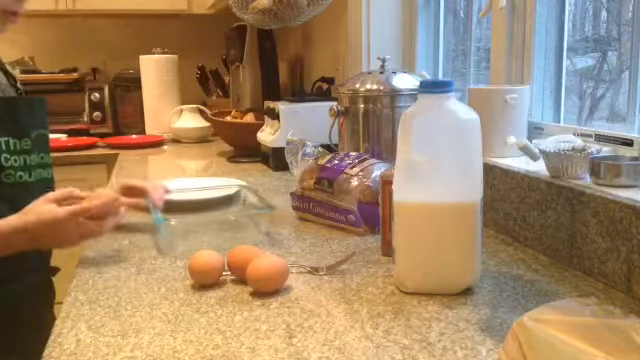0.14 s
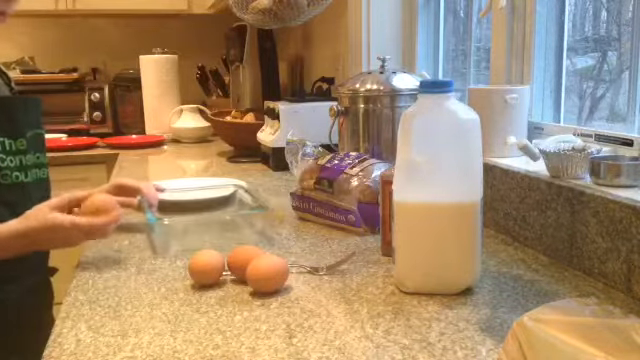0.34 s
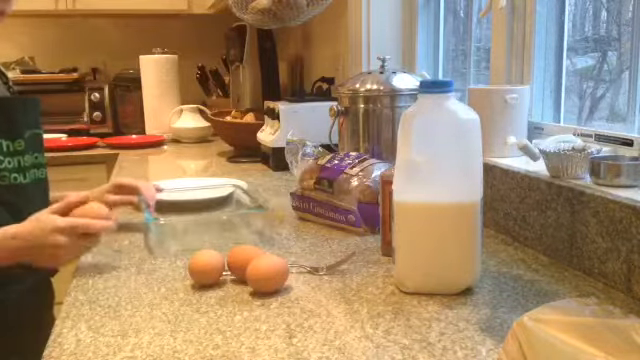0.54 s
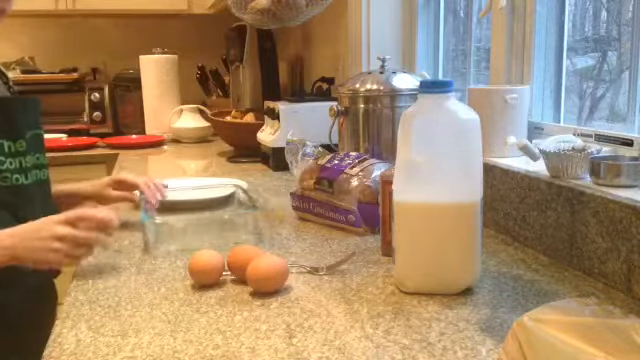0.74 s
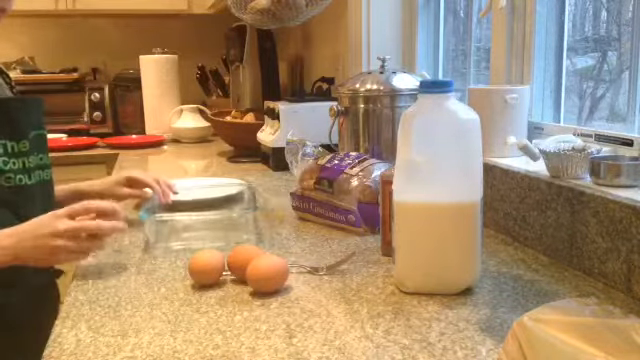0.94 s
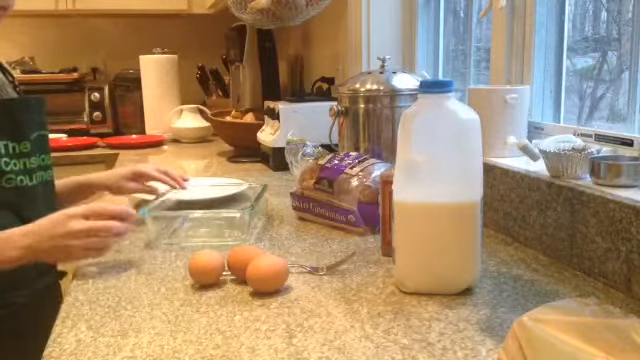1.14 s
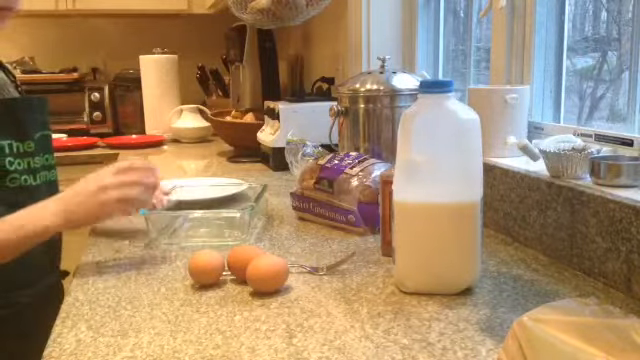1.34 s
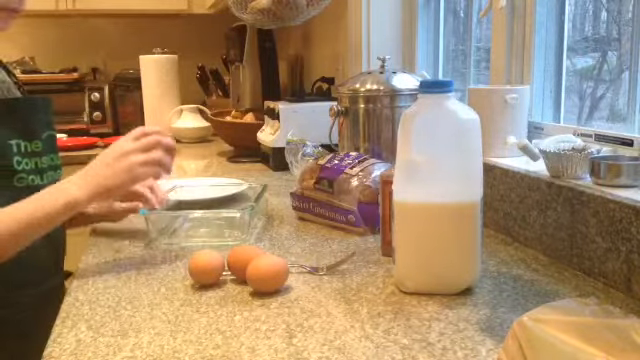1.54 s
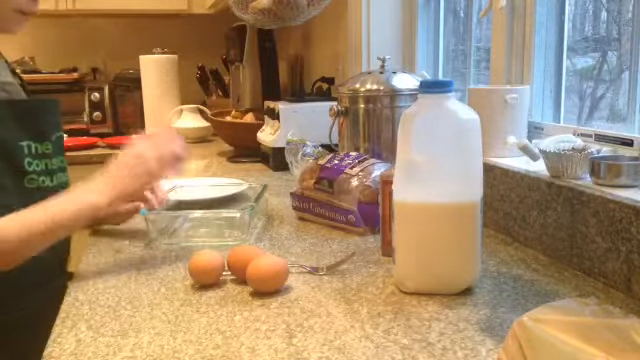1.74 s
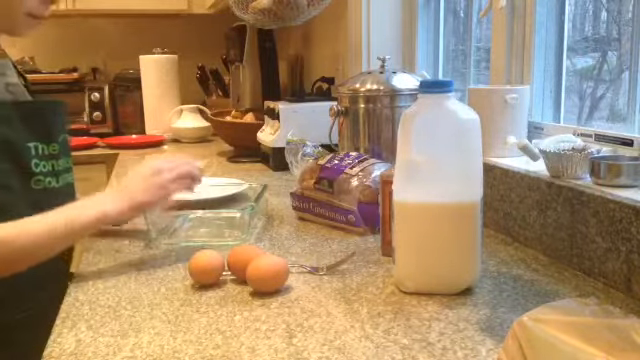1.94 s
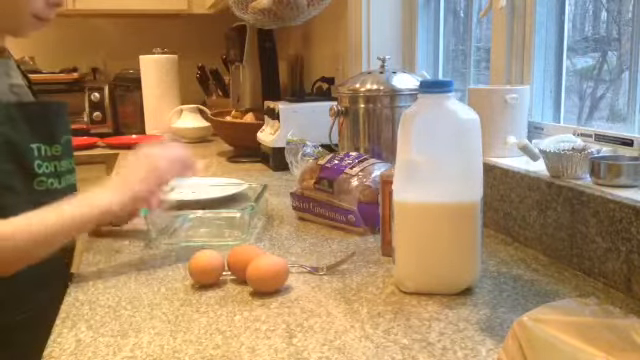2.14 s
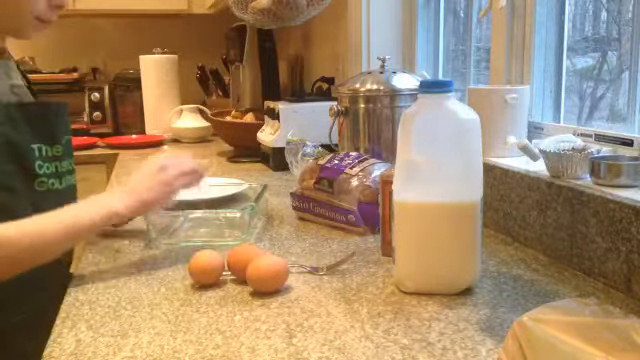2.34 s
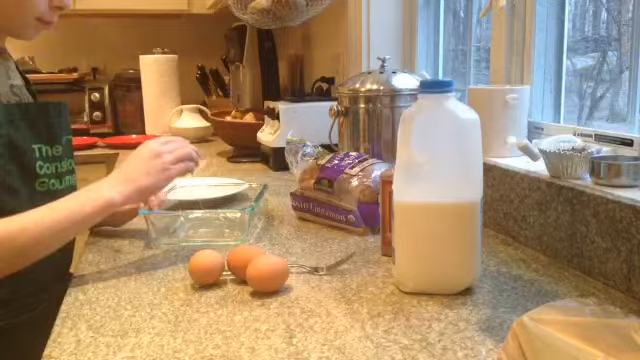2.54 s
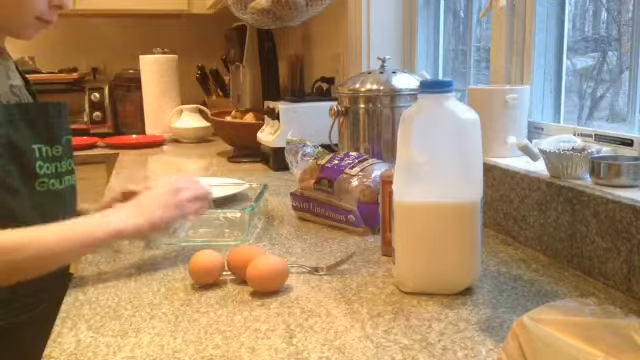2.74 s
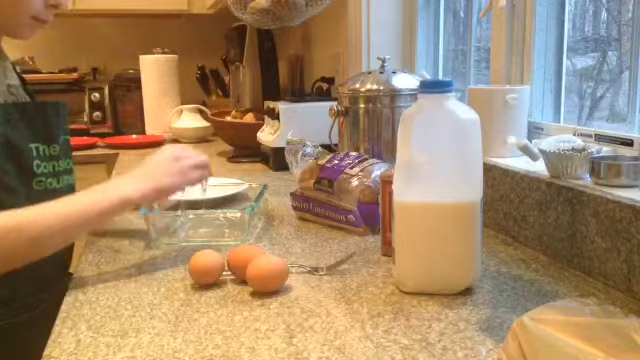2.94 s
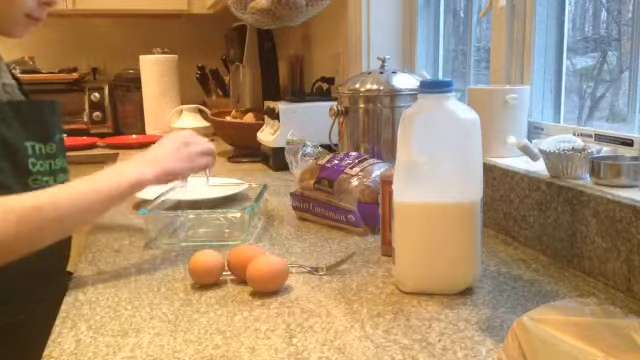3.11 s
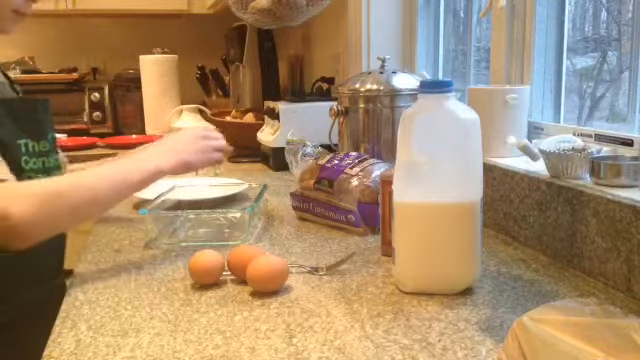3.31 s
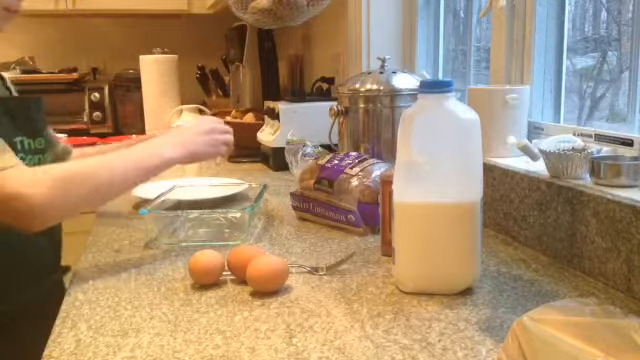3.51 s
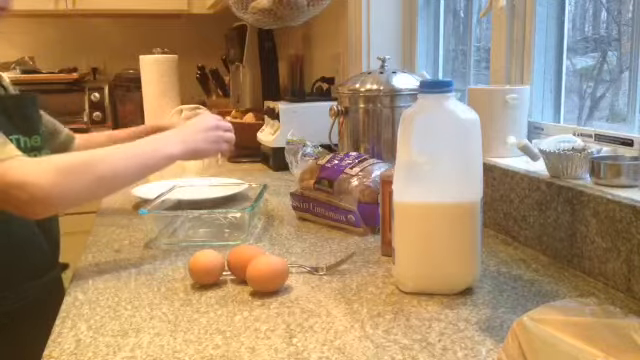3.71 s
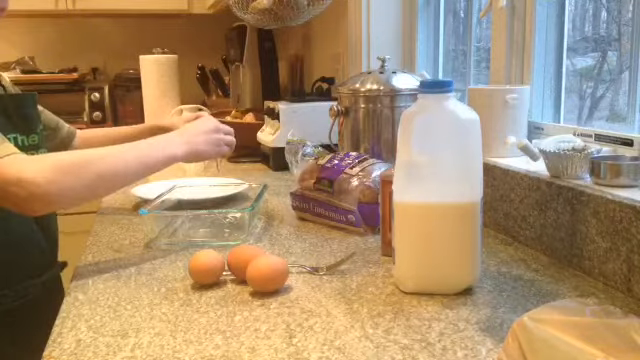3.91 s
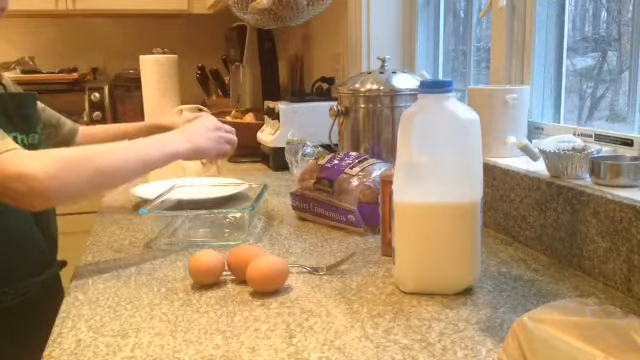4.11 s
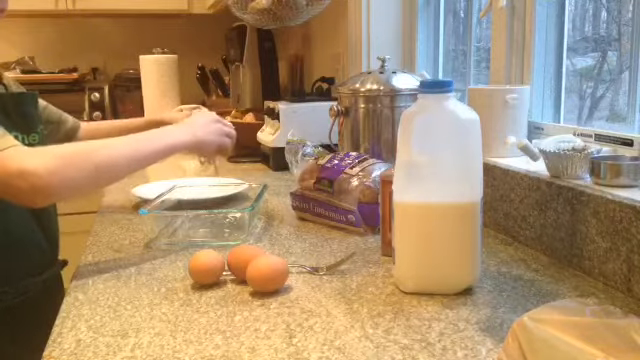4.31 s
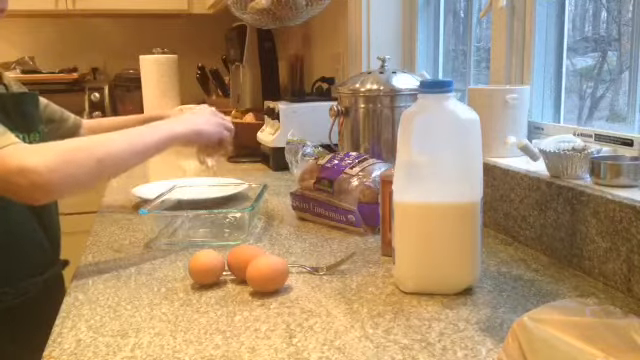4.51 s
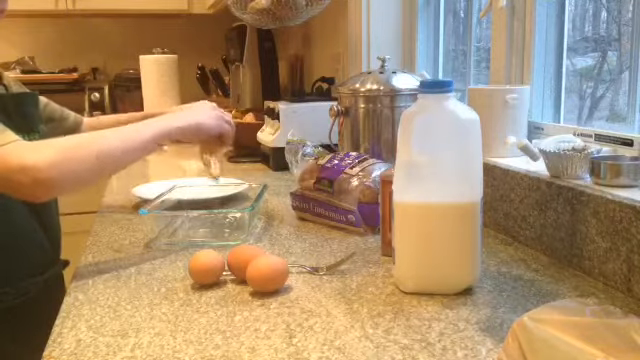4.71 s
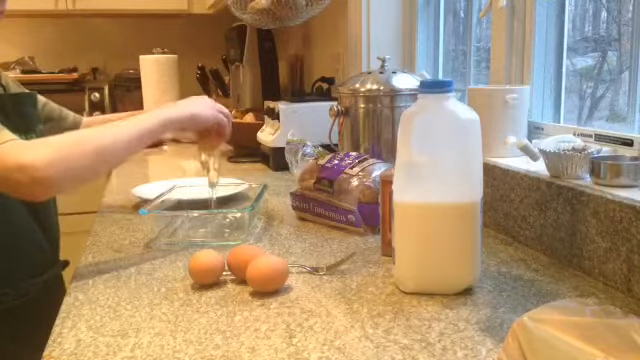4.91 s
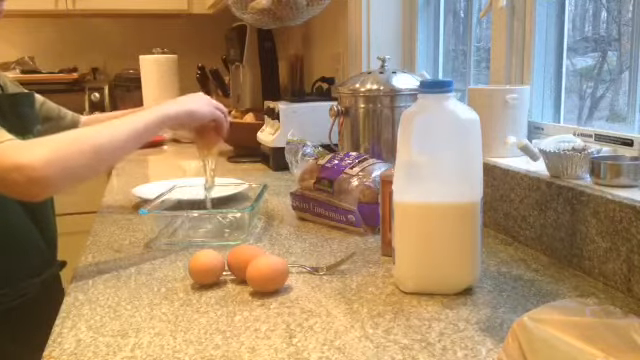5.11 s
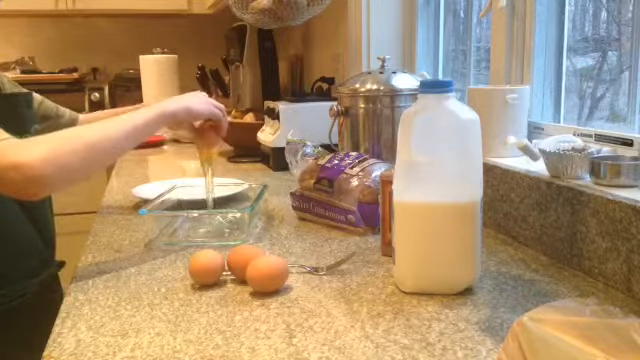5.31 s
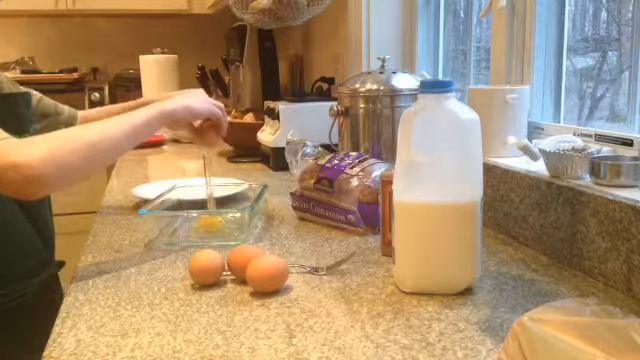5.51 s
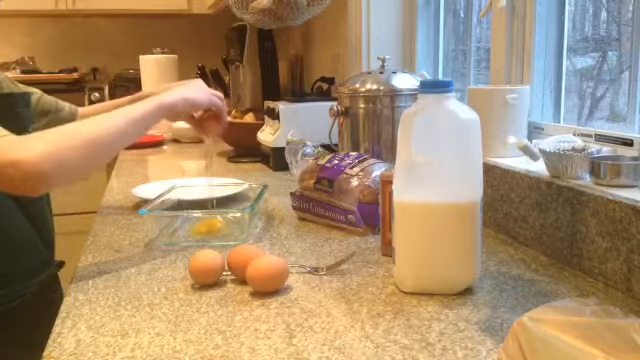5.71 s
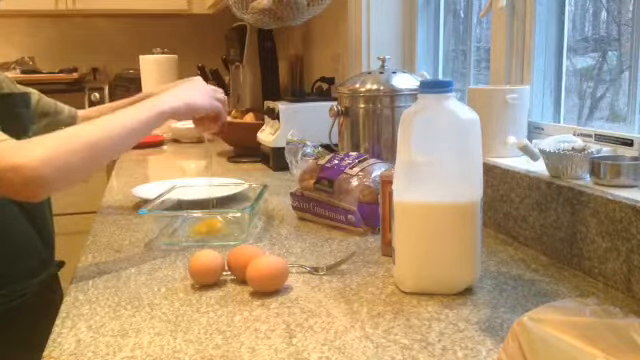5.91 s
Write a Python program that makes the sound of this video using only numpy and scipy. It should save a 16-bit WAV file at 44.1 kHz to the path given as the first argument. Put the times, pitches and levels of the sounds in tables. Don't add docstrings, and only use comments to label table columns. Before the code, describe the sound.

Close mono sound of egg cracking in a reflective kitchen. First, a glass dish grates and bumps on stone, with a small squeak and a short grinding stop. Then an egg hits the rim three times, dull and sharp together, the dish knocking back down after the later blows. A quiet gap with faint motor hum leads to brittle snaps, tiny chips, tearing skin, hollow pops and a barely audible landing.

```python
import sys
import numpy as np
from scipy import signal
from scipy.fft import rfft, irfft
from scipy.io import wavfile
from scipy.ndimage import uniform_filter1d, minimum_filter1d

SR = 44100
rng = np.random.default_rng(int(sys.argv[2]) if len(sys.argv) > 2 else 0)


def level_to_linear(level):
    exponent = np.asarray(level, float) / 20
    return 10 ** exponent


def wrap_up_sound(samples):
    columns = np.atleast_2d(samples).T
    tamed = np.clip(columns, -1, 1)
    steps = np.round(tamed * 32767).astype(np.int16)
    wavfile.write(sys.argv[1], SR, steps)


N = 262395

# mode_hz, level_db, t60_s
THUD_MODES = [(500, -11, 0.01), (556, -14.5, .03), (764, -2.5, 0.035), (790, 1.26, 0.12), (925, 1.2, 0.09),
              (986.4, -4.5, 0.02972), (1100, -1, 0.02922), (1260.3, -12, 0.041), (1412, -8, 0.12),
              (1300, 4, 0.011), (1536, 5, 0.019), (1664, -9, .03), (1735, 3.65, .03), (1846, 7, 0.014),
              (2030, -7, .03), (2131, -4, 0.026), (2262, 2, 0.057), (2450, 0.3, 0.024), (2560, -3.5, 0.066)]
# mode_hz, level_db, t60_s
GLASS_MODES = [(2840, -3.5, 0.03), (3180, -2, 0.014), (3440, -2.5, 0.034), (3776, -4, 0.085),
               (3950, -5.5, .02), (4242, -0.4, 0.055), (4563, -5, 0.02), (5436, -6, 0.011),
               (5300, -15, 0.007), (6170, -14, 0.018), (5690, -15, 0.038), (6740, -7.5, 0.0336),
               (7587, -6.5, 0.043), (9250, -15.5, 0.023)]
# mode_hz, level_db, t60_s
SLAB_MODES = [(282, -1.5, 0.19), (346, -10, 0.089)]
# freq_hz, level_db
CRUNCH_SPECTRUM = [(530, -49), (900, -30), (1410, -6), (2890, -11.5), (4800, -0.5), (6180, -10.5),
                   (9530, -4.5), (13800, -11.5), (15400, -12), (16000, -49.5)]
LONGEST_THUD_S = 0.021


def rms_one(x):
    return x / np.sqrt(np.mean(x ** 2) + 1e-20)


def in_time(rows):
    s, value = np.transpose(rows)
    return np.interp(np.arange(N) / SR, s, value)


def at_hz(points, hz):
    table_hz, value = np.transpose(points)
    return np.interp(np.log(hz + 1), np.log(table_hz), value)


def coloured(x, spectrum):
    gain = level_to_linear(at_hz(spectrum, np.fft.rfftfreq(4096, 1 / SR)))
    cepstrum = irfft(np.log(gain))
    cepstrum[1:2048] *= 2
    cepstrum[2049:] = 0
    response = irfft(np.exp(rfft(cepstrum)))
    return signal.fftconvolve(x, rms_one(response) / 64)[:len(x)]


def radiated(x, low_hz):
    return signal.sosfilt(signal.butter(3, low_hz, "high", fs=SR, output="sos"), x)


def ring(clicks, hz, t60):
    r = level_to_linear(-60 / (t60 * SR))
    w = 2 * np.pi * hz / SR
    return signal.lfilter([0, np.sin(w)], [1, -2 * r * np.cos(w), r * r], clicks + 1e-18)


def grains(per_s, spread_db, size):
    unevenness = np.minimum(rng.exponential(1, size), 4)
    sizes = level_to_linear(spread_db * unevenness) * rng.choice([-1, 1], size)
    return sizes * (rng.random(size) < per_s / SR)


def chatter(times, levels_db, lengths_ms, per_s):
    out = np.zeros(N + 4000)
    age_ms = np.arange(4000) / SR * 1000
    for s, level_db, length in zip(times, levels_db, lengths_ms):
        burst = grains(per_s, 3.65, size=4000) * np.exp(-age_ms / max(length, 0.3))
        burst[0] = 1.3
        at = round(s * SR)
        out[at:at + 4000] += level_to_linear(level_db) * burst / np.linalg.norm(burst)
    return out[:N]


def strike(modes, times, levels_db, lengths_ms, tilt_db=0, longest_s=1):
    out = np.zeros(N)
    clicks = chatter(times, levels_db, lengths_ms, 1100)
    starts = np.round(np.array(times) * SR)
    latest = np.maximum(np.searchsorted(starts, np.arange(N), "right") - 1, 0)
    for hz, level_db, t60 in modes:
        luck_db = 1.5 * rng.standard_normal(len(times)) + tilt_db * np.log2(hz / 1300)
        strength = level_to_linear(level_db + luck_db) * rng.choice([-1, 1], len(times))
        out += ring(clicks * strength[latest], hz, min(t60, longest_s))
    return out


def drift(per_s):
    points = rng.standard_normal(400)
    return np.interp(np.arange(N) / SR * per_s, np.arange(len(points)), points)


def room_tone():
    # freq_hz, density_db
    air = [(35, -57.5), (70, -39.5), (100, -16.5), (150, -17.5), (240, -3), (285, -11.5), (370, -11),
           (430, -20), (946, -21), (1500, -30), (2650, -38.5), (6000, -39.5), (13900, -41.5), (16000, -49)]
    # line_hz, width_hz, level_db
    compressor = [(115, 8.0, -76), (238.6, 3.2, -63), (333.2, 11, -64), (189, 18, -65), (930, 12, -77.5)]
    mains_hz, mains_db = 121.2, -65.5
    out = level_to_linear(-59.5) * rms_one(coloured(rng.standard_normal(N), air))
    out += level_to_linear(mains_db) * rms_one(np.sin(2 * np.pi * mains_hz * np.arange(N) / SR))
    for hz, width_hz, level_db in compressor:
        t60 = np.log(1000) / np.pi / width_hz
        out += level_to_linear(level_db) * rms_one(ring(rng.standard_normal(N), hz, t60))
    return out


def slide():
    # start_s, level_db
    effort = [
        (0.0, -45.5),
        (0.22, -45.5),
        (0.33, -54.5),
        (0.8, -58),
        (0.95, -43.5),
        (1.07, -45.5),
        (1.3, -61.5),
        (1.67, -53),
        (1.85, -55.5),
    ]
    # mode_hz, level_db, t60_s
    low_modes = [(636, -8.5, 0.022), (765, -2.5, 0.01), (850, -13, 0.09), (1110, -4.5, 0.0076),
                 (1324, -3.5, .035), (1450, -1.5, 0.041), (1757, 1.5, 0.01), (2031, -7, 0.059),
                 (2340, -2.5, 0.017), (2610, -17.5, 0.073)]
    # mode_hz, level_db, t60_s
    high_modes = [(3200, 0.5, 0.013), (3486, -3.5, 0.046), (4000, -6, 0.051), (4260, -2, .05),
                  (4468, 1, 0.013), (4700, 0.5, 0.0048)]
    low_db = in_time(effort)
    high_db = -67.5 + 0.55 * (low_db + 50)
    hiss_db = -70.5 + 0.7 * (low_db + 50)
    low, high = np.zeros(N), np.zeros(N)
    for hz, level_db, t60 in low_modes:
        low += ring(level_to_linear(level_db + 6.3 * drift(14)) * grains(1100, 6.4, size=N), hz, t60)
    for hz, level_db, t60 in high_modes:
        high += ring(level_to_linear(level_db + 5.4 * drift(11)) * grains(970, 4.7, size=N), hz, t60)
    hiss = ring(radiated(grains(5000, 2.5, size=N), low_hz=5550), 7400, 0.0005)
    body = level_to_linear(low_db - 3.5) * rms_one(low) + level_to_linear(high_db + 1.0) * rms_one(high)
    t = np.arange(N) / SR
    hiss_gate = np.clip((1.75 - t) / 0.15, 0, 1)
    moving = t < effort[-1][0]
    return moving * (radiated(body, low_hz=450) + level_to_linear(hiss_db - 2.5) * rms_one(hiss) * hiss_gate)


def kitchen(x, gap_ms, build_ms, near_db, near_ms):
    # freq_hz, t60_s
    decay = [(200, 0.91), (600, 0.64), (1500, 0.6), (4000, 0.61), (9000, 0.31), (15000, 0.3)]
    shift_s = 0.2
    hop = round(shift_s * SR)
    age = np.arange(round(0.9 * SR)) / SR
    edges = 90 * 2 ** np.arange(0, 8, 0.5)
    tails = 0
    for low, high in zip(edges, edges[1:]):
        band_filter = signal.butter(2, [low, high], "band", fs=SR, output="sos")
        band = signal.sosfilt(band_filter, rng.standard_normal((5, len(age))))
        tails = tails + band * level_to_linear(-60 * age / at_hz(decay, np.sqrt(low * high)))
    age_ms = age * 1000
    tails *= np.clip((age_ms - gap_ms) / build_ms, 0, 1)
    tails *= 1 + level_to_linear(near_db) * np.exp(-(age_ms / near_ms) ** 2)
    place, out = np.arange(N) / hop, 0
    for k, tail in enumerate(tails):
        distance = np.abs((place - k + 2.5) % 5 - 2.5)
        share = np.cos(np.pi / 2 * np.clip(distance, 0, 1))
        out = out + signal.oaconvolve(x * share, tail / np.linalg.norm(tail))[:N]
    return out


def nudges():
    # start_s, thud_db, hardness_db_per_octave, chatter_ms
    knocks = [(0.47, -32, -16.5, 11), (0.484, -28, -10.5, 19), (0.547, -43, -19, 22),
              (0.734, -28.5, -1, 5.1), (0.921, -28, -7.5, 13), (1.062, -29.5, -2.5, 3.9),
              (1.078, -27.5, -4, 10.5), (1.112, -25, 0.5, 7.6), (1.56, -30.5, 4, 21),
              (1.577, -30, -1.2, 9.0), (1.605, -32.5, -1.5, 25), (1.641, -29, 6, 27)]
    s, thud_db, tilt_db, length = np.transpose(knocks)
    glass_db = thud_db - 13.5 + 1.2 * tilt_db + 0.03 * length
    boom_db = thud_db - 16 - 1.1 * tilt_db
    thud = strike(THUD_MODES, s, thud_db - 12.5, length, tilt_db, LONGEST_THUD_S)
    glass = strike(GLASS_MODES, s, glass_db + 7, length, -7.0, LONGEST_THUD_S)
    tick = coloured(chatter(s, glass_db + 0.5, 0.3 * length, 7700), CRUNCH_SPECTRUM)
    boom = radiated(strike(SLAB_MODES, s, boom_db, length), low_hz=208)
    return radiated(thud + glass, low_hz=400) + tick + boom


def squeaks():
    # start_s, peak_db, pitch_hz
    slips = [
        (0.5464, -24.5, 6250),
        (0.5825, -31, 7450),
        (0.8658, -29, 8610),
    ]
    return sum(ring(chatter([s], [db - 5.5], [12.0], 2700), hz, 0.0025) for s, db, hz in slips)


def grinds():
    # start_s, level_db, length_ms
    stops = [
        (1.555, -41, 8.7),
        (1.591, -41, 22),
        (1.642, -38.5, 61),
    ]
    # mode_hz, level_db, t60_s
    held_modes = [(2700, -4.5, 0.021), (4173, 1.5, 0.021), (4660, 1.5, .008), (5128, -5.5, 0.013)]
    s, level_db, length = np.transpose(stops)
    top_cut = signal.butter(6, 5400, fs=SR, output="sos")
    slips = signal.sosfilt(top_cut, chatter(s, level_db + 1.5, length, 5000))
    return radiated(sum(level_to_linear(db) * ring(slips, hz, t60) for hz, db, t60 in held_modes), low_hz=2200)


def blows():
    # start_s, thud_db, rim_db, chatter_ms
    contacts = [(1.856, -3.5, -17, 4.5), (1.861, 4.5, -17.5, 2.9), (1.868, -1, -11.5, 3.8),
                (1.877, -8.5, -20.5, 11), (1.896, -10, -30.5, 5), (2.237, -3.5, -14, 9.8),
                (2.24, 4, -12, 5.3), (2.25, -10.5, -23, 3.2), (2.731, -14.5, -26.5, 5.8),
                (2.739, 0.1, -28, 3.5), (2.75, -8, -22, 6.0)]
    # start_s, thud_db, chatter_ms
    bounces = [
        (2.298, -7, 4.3),
        (2.798, -16, 5),
        (2.804, -7.5, 4.65),
    ]
    blow_tilt_db, bounce_tilt_db = -3.5, -3
    rows = [(s, db, rim_db, rim_db - 8, ms, blow_tilt_db) for s, db, rim_db, ms in contacts]
    rows += [(s, db, db - 18.5, db - 42, ms, bounce_tilt_db) for s, db, ms in bounces]
    s, thud_db, glass_db, crunch_db, length, tilt_db = np.transpose(sorted(rows))
    thud = strike(THUD_MODES, s, thud_db - 13.5, length, tilt_db, LONGEST_THUD_S)
    glass = strike(GLASS_MODES, s, glass_db - 7, length)
    crunch = coloured(chatter(s, crunch_db + 22.5, 0.6 * length + 0.99, 15000), CRUNCH_SPECTRUM)
    band = signal.butter(2, [610, 2600], "band", fs=SR, output="sos")
    thud += signal.sosfilt(band, chatter(s, thud_db + 13.5, length + 2.2, 6000))
    boom_db = thud_db - 25.5 - 7.3 * (tilt_db - blow_tilt_db)
    boom = strike(SLAB_MODES, s, boom_db, length, 0, LONGEST_THUD_S)
    body = radiated(radiated(thud, low_hz=435), low_hz=500)
    return body + radiated(glass, low_hz=2370) + crunch + boom


def walls():
    # start_s, level_db, tilt_db_per_octave, free_s
    free_rings = [
        (1.866, -25, 10, 0.025),
        (2.238, -22, -1.5, 0.0078),
        (2.297, -27.5, -22, 0.024),
        (2.737, -19.5, -26, 0.0066),
        (2.802, -23.5, -24, 0.029),
    ]
    mode_hz = (2384, 3500, 4010, 4310)
    mode_t60_s = (.1, .2, .25, .4)
    mode_damped_db = (-15, -19, -15.5, -17)
    mode_db = (3.3, 6.5, -4.5, -0.5)
    out = np.zeros(N + SR)
    age = np.arange(SR // 2) / SR
    for s, blow_db, tilt_db, free_s in free_rings:
        at = round(s * SR)
        landed = np.clip((age - free_s) / 0.0013, 0, 1)
        swell = np.minimum(age / 0.0044, 1)
        for hz, t60, damped_db, strength_db in zip(mode_hz, mode_t60_s, mode_damped_db, mode_db):
            level_db = strength_db + blow_db + tilt_db * np.log2(hz / mode_hz[0])
            envelope = level_to_linear(level_db - 60 * age / t60 + damped_db * landed) * swell
            out[at:at + len(age)] += envelope * np.sin(2 * np.pi * (hz * age + rng.random()))
    return out[:N]


def flakes():
    # start_s, peak_db, crack_over_peak_db
    snaps = [(3.6483, -37, -4.5), (3.7861, -50.5, 4.5), (3.8536, -43, -3), (3.8734, -39.5, -25),
             (3.8888, -44.5, 4), (3.917, -40, -10), (3.973, -55, 3), (3.9927, -37.5, -7), (4.1807, -49, -3),
             (4.2457, -55, -1), (4.3193, -27.5, -5.5), (4.377, -35.5, 2), (4.4225, -25.5, -2),
             (4.431, -41.5, 15), (4.4404, -39, -19), (4.5332, -42, -1), (4.7048, -46, -12),
             (4.9115, -52.5, -4), (5.085, -36.5, -13), (5.137, -46, 8), (5.1481, -39, 10.5),
             (5.1732, -33.5, -20), (5.233, -41.5, -3), (5.2606, -45, 6), (5.33, -31.5, -0.5),
             (5.34, -29.5, -5), (5.378, -34.5, 9), (5.435, -43.5, 4.5), (5.5907, -49, 2),
             (5.9038, -71, -14.5)]
    # start_s, peak_db, crack_over_peak_db
    chips = [(3.8004, -28.5, -29), (3.821, -31.5, -32), (3.842, -29.5, -33), (3.9984, -37.5, -20),
             (4.0515, -49, -13.5), (4.2956, -44, -4), (4.4069, -22, -16), (4.5748, -34, -4),
             (4.7206, -27, -5.5), (4.7309, -23.5, -0.5), (4.7833, -26, -16), (4.8401, -30, -3),
             (4.8669, -31.5, -0.5), (5.073, -39.5, -13), (5.2718, -33, 4.5), (5.7287, -37, -3.5)]
    flake_hz, chip_hz = 4430, 9300
    out, cracks = np.zeros(N), np.zeros(N)
    for s, peak_db, top_db, usual_hz in [(*row, flake_hz) for row in snaps] + [(*row, chip_hz) for row in chips]:
        part = slice(round(s * SR), round(s * SR) + 6000)
        hz = usual_hz * (1 + 0.09 * rng.standard_normal())
        crack = chatter([s], [peak_db + top_db + 11], [4.0], 2200)[part]
        echo = np.zeros(rng.integers(3, 12))
        echo[[0, -1]] = 1, -0.7
        cracks[part] += signal.lfilter(echo, [1], crack)
        out[part] += ring(chatter([s], [peak_db + 1], [4.5], 2700)[part], hz, 18.6 / hz)
    return coloured(cracks, CRUNCH_SPECTRUM) + out


def hollow_pops():
    # start_s, level_db
    pops = [(3.6485, -52), (3.8744, -51), (3.9928, -65), (4.321, -57), (4.422, -44), (4.431, -42),
            (4.7044, -50), (4.7202, -51), (4.7822, -53.5), (4.8391, -39), (4.9106, -50.5), (5.086, -52.5),
            (5.1374, -47), (5.1501, -44.5), (5.174, -49), (5.2344, -53), (5.2626, -51), (5.2691, -39.5),
            (5.295, -44), (5.3315, -34.5), (5.3386, -38.5), (5.378, -39.5), (5.434, -52), (5.5907, -56),
            (5.89, -59), (5.9194, -48.5)]
    # start_s, pitch_hz
    hollow = [
        (4.45, 1421),
        (4.7, 765),
        (4.87, 850),
        (5.15, 1030),
        (5.33, 1450),
        (5.6, 1500),
        (5.92, 1900),
    ]
    out, hollow_hz = np.zeros(N), in_time(hollow)
    for s, level_db in pops:
        part = slice(round(s * SR), round(s * SR) + 6000)
        hz = hollow_hz[round(s * SR)]
        cycles = 17.2 if s > 4.6 else 11
        wet_pops = chatter([s], [level_db + 10.5], [13.0], 1500)[part]
        note = ring(wet_pops, hz, cycles / hz)
        note += level_to_linear(-9.5) * ring(wet_pops, rng.uniform(1.62, 2.24) * hz, 0.0092)
        out[part] += radiated(note, low_hz=0.97 * hz)
    return out


def tearing():
    # start_s, hold_s, level_db
    pulls = [
        (3.84, .05, -37.5),
        (4.331, 0.16, -39),
        (4.722, .05, -42),
        (5.117, 0.26, -40),
        (5.928, 0.057, -50),
    ]
    t, pull = np.arange(N) / SR, 0
    for s, hold, level_db in pulls:
        rise_db = 230 * np.maximum(s - t, 0)
        fall_db = 143 * np.maximum(t - s - hold, 0)
        pull = pull + level_to_linear(level_db - rise_db - fall_db)
    return level_to_linear(-21.0) * pull * rms_one(coloured(grains(700, 3.7, size=N), CRUNCH_SPECTRUM))


def plop():
    # mode_hz, level_db, t60_s
    landing_modes = [(3295, -2, .08), (3763, -8, .06), (4274, -3, 0.07), (4730, -8, 0.04), (5254, 6, 0.09)]
    return radiated(strike(landing_modes, [5.591], [-49.5], [0.5]), low_hz=2800)


def scene():
    dish = slide() + nudges() + squeaks() + grinds() + blows()
    ringing = walls()
    egg = radiated(flakes() + hollow_pops() + tearing() + plop(), low_hz=537)
    send = level_to_linear(-8.5) * dish + level_to_linear(-17) * ringing + level_to_linear(-5.0) * egg
    wet = kitchen(send, gap_ms=2.7, build_ms=1.7, near_db=6.5, near_ms=37.0)
    return np.tile(dish + ringing + egg + wet + room_tone(), (2, 1))


def roll_off(x):
    return signal.sosfilt(signal.butter(12, 16510, fs=SR, output="sos"), x)


def record(dry):
    peak = -minimum_filter1d(-np.abs(dry), size=177)
    limited = dry * uniform_filter1d(np.minimum(1, 0.92 / peak), size=89)
    thin = signal.sosfilt(signal.butter(3, 95, "high", fs=SR, output="sos"), limited)
    top_cut = signal.cheby2(10, 60, 16300, fs=SR, output="sos")
    return roll_off(signal.sosfilt(top_cut, thin))


dry = scene()
out = record(dry)
wrap_up_sound(out)
```